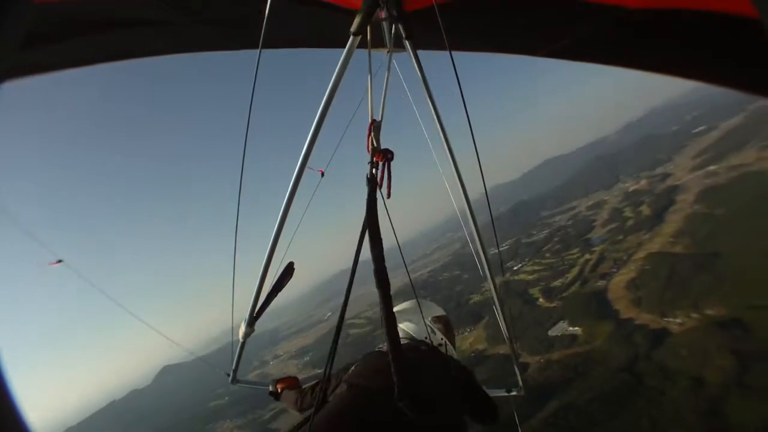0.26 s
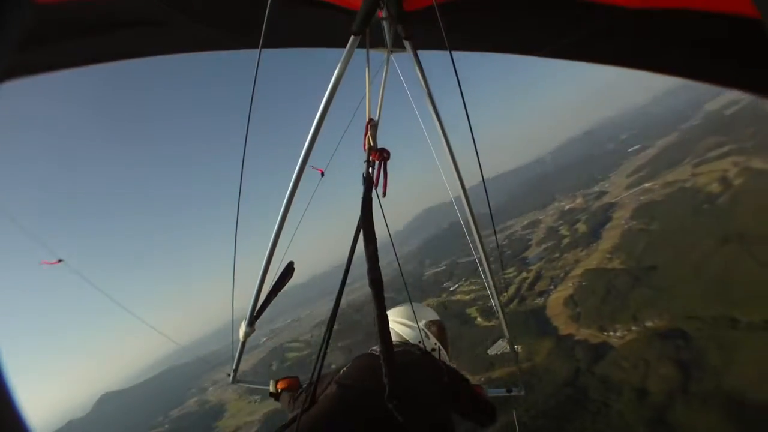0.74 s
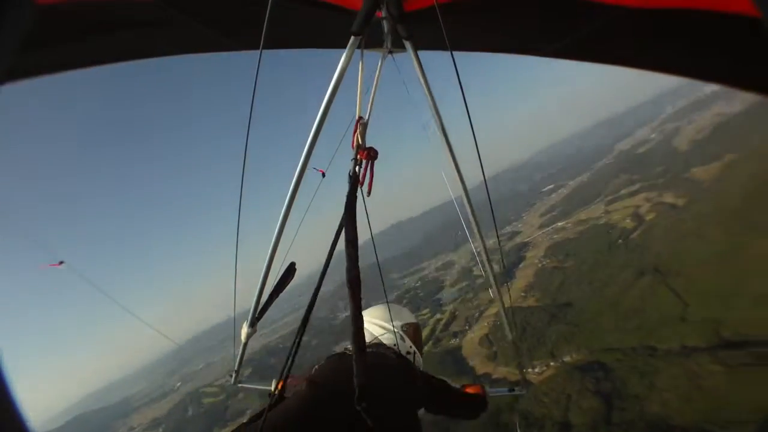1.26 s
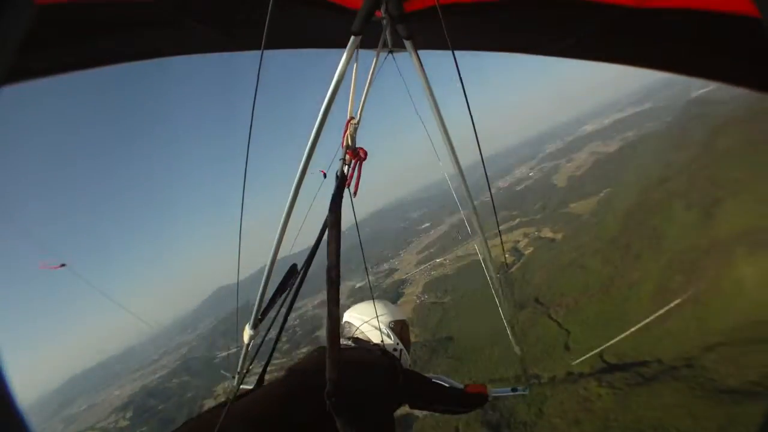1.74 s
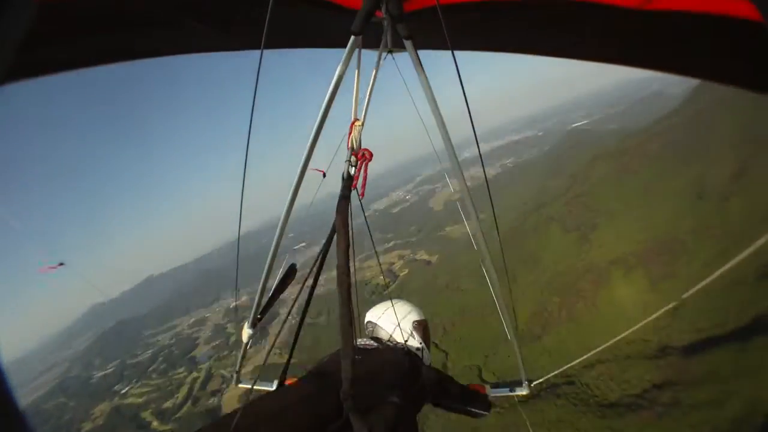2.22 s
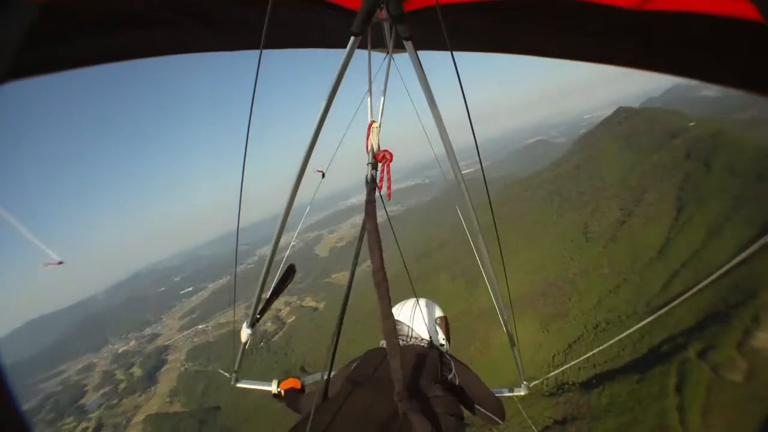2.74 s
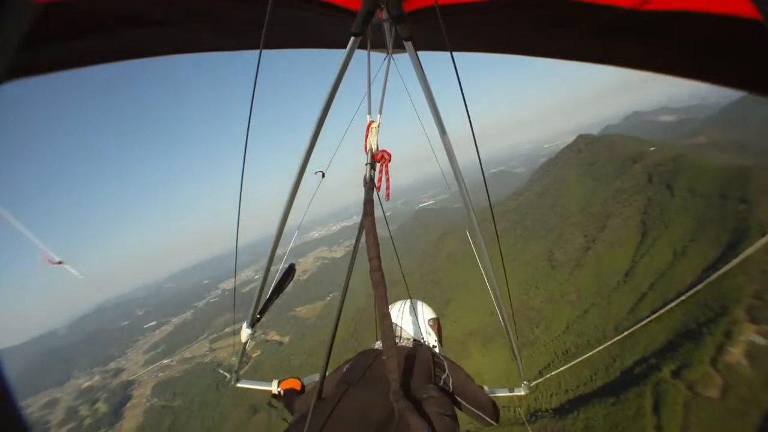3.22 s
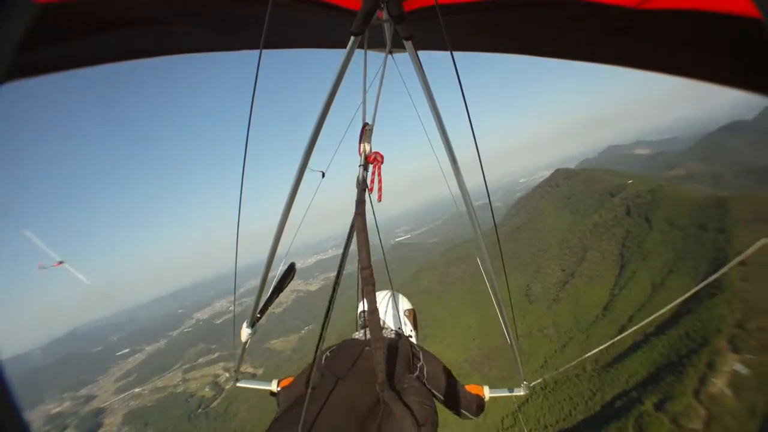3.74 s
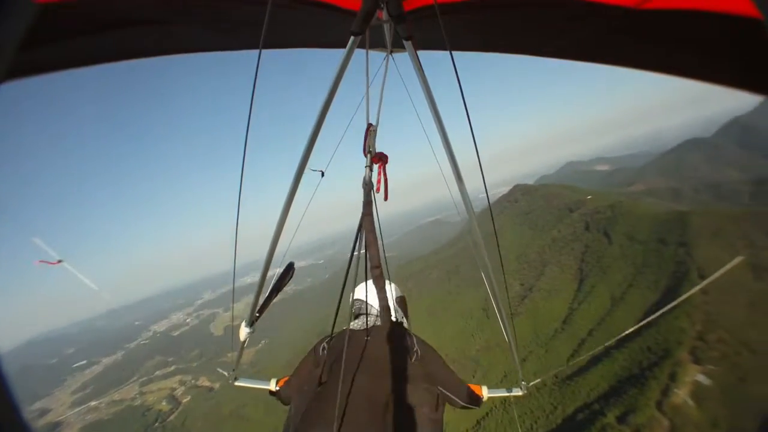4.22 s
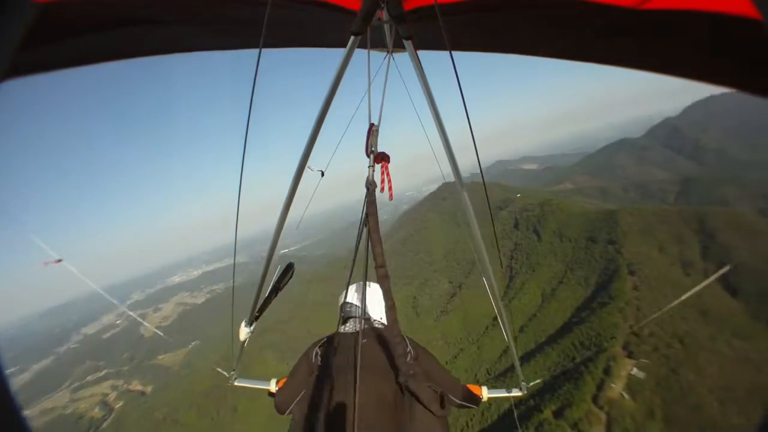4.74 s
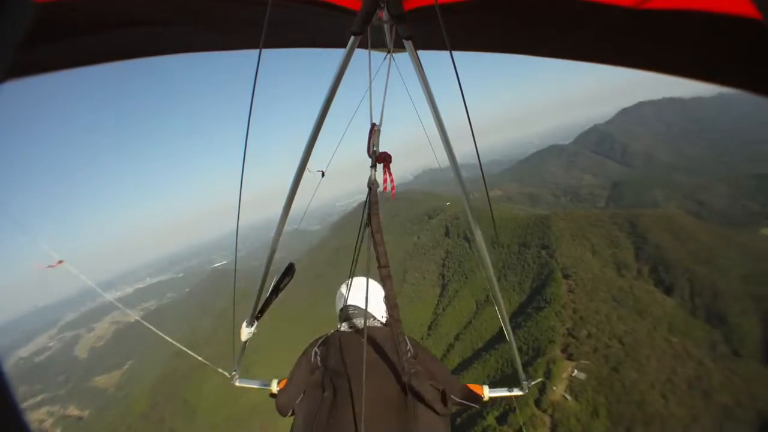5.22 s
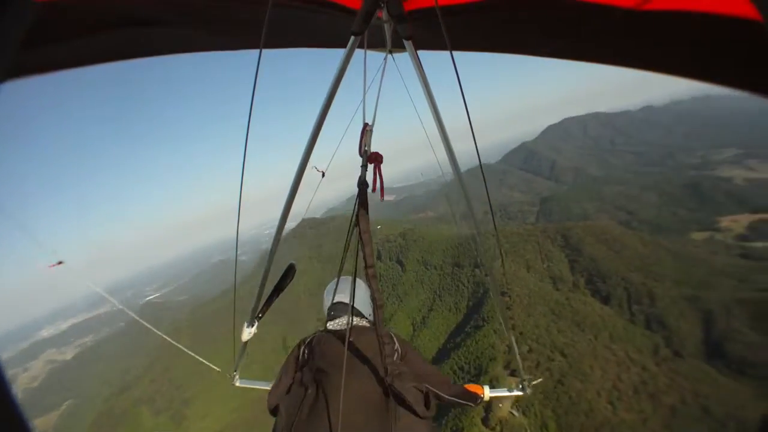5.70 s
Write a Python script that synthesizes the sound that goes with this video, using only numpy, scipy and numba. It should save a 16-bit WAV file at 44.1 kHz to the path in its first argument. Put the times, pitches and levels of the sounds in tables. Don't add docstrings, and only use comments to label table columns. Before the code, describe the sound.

Fast air rushes continuously past a sealed camera fixed to a hang glider in open sky. A dense low roar flutters rapidly, mixed with a wavering low hum that grows stronger after two seconds and rises slightly. The close microphone overloads, making the wind crunchy and gritty; the right side is thinner in the bass.

```python
import sys
import numpy as np
from scipy import signal
from scipy.fft import rfft, irfft, next_fast_len
from scipy.io import wavfile
from scipy.ndimage import uniform_filter1d
from numba import njit

SR = 44100
rng = np.random.default_rng(int(sys.argv[2]) if len(sys.argv) > 2 else 0)


def voltage_ratio(level):
    return 10 ** (np.asarray(level, float) / 20)


def dump(signal):
    limited = np.clip(np.atleast_2d(signal).T, -1, 1)
    pcm = np.round(limited * 32767).astype(np.int16)
    wavfile.write(sys.argv[1], SR, pcm)


N = 263277

# frequency in Hz, spectral level in dB per Hz.
HISS_SPECTRUM = [(300, 3), (800, -6), (1300, -12), (2200, -29), (3650, -25.5), (4900, -26), (5200, -64),
                 (6000, -42)]
# centre in Hz, width in Hz, lift in dB.
SHELL_MODES = [(1712, 536, 15), (2680, 430, 11.5), (3170, 480, 9.5), (4140, 260, 7), (4560, 480, 7.5)]
# peak time in seconds, change of level in dB.
GUSTS = [
    (0, -4),
    (.3, 0),
    (1.15, -0.5),
    (4.1, 2),
    (4.8, -0.5),
    (5.75, 2),
]
# frequency in Hz, spectral level in dB per Hz.
ROAR_SPECTRUM = [(8.8, -34), (15, -13), (59, -16.5), (135, -13), (167, -10), (209, -8.5), (237, -5),
                 (297, -5.5), (487, -4.5), (1000, -30), (1300, -57), (2200, -120)]
# centre in Hz, width in Hz, lift in dB.
CAVITY_MODES = [(635, 170, 0.57)]
# time in seconds, pitch in Hz, hum level in dB.
SHEDDING = [(0, 204.9, -18), (.15, 222, -15), (.45, 230, -14), (.9, 217, -16), (1.45, 222.9, -13),
            (1.75, 224, -16.5), (2.02, 236, -11), (2.38, 206.9, -10.5), (2.65, 220.1, -11),
            (2.9, 212.9, -10), (3.3, 239.3, -12), (3.55, 228.1, -15.5), (3.8, 251.2, -13),
            (4.25, 251.7, -11), (4.75, 240.6, -13.5), (5.25, 254.3, -13), (5.7, 234.6, -11),
            (5.97, 249.7, -12.5)]
# frequency in Hz, gain in dB.
CAMERA_RESPONSE = [(700, 0), (2000, -1.2), (4500, -1.8), (6000, -5), (8000, -2.5), (11000, -1.5),
                   (15000, -3)]
# frequency in Hz, spectral level in dB per Hz.
GRAIN_SPECTRUM = [(300, -21), (700, -4), (1400, -8), (2200, -15.5), (4000, -19), (5200, -26), (9500, -30.5),
                  (11000, -53), (11500, -18), (12000, -26), (12500, -17), (14000, -26), (15500, -28)]

GUST_HALF_S = 0.23
CRUISE_HZ = 232
ROAR_DB, LOW_HISS_DB, HIGH_HISS_DB = -10.5, -26, -36
ROAR_DB_PER_HZ, LOW_DB_PER_HZ, HIGH_DB_PER_HZ = 0.0265, -0.16, 0.06
SPEED_SMOOTH_S = 1.8
HOLD_HZ = 12000
TOP_HZ = 15750


def level(x):
    return x / np.sqrt(np.mean(x ** 2))


def walk(rate):
    k = int(SR / rate)
    held = np.repeat(rng.standard_normal(N // k + 1), k)
    slewed = uniform_filter1d(uniform_filter1d(held, k), k)
    return level(slewed[:N])


def curves(table):
    seconds, *columns = np.transpose(table)
    return [np.interp(np.arange(N) / SR, seconds, column) for column in columns]


def colour(x, points, modes=()):
    size = next_fast_len(N)
    hz = np.maximum(np.arange(size // 2 + 1) * SR / size, 1)
    point_hz, point_db = np.transpose(points)
    db = np.interp(np.log(hz), np.log(point_hz), point_db)
    for centre, width, lift in modes:
        db = db + lift / (1 + (2 * (hz - centre) / width) ** 2)
    return irfft(rfft(x, size) * voltage_ratio(db), size)[..., :N]


def shell_hiss(eddies, bright_db):
    puffs = voltage_ratio(0.83 * eddies + 0.5 * walk(300))
    split = signal.butter(2, 2300, fs=SR, output="sos")
    noise = rng.standard_normal(N)
    low = signal.sosfilt(split, noise)
    high = noise - low
    mix = voltage_ratio(0.33 * walk(45)) * low + voltage_ratio(bright_db + 0.22 * walk(45)) * high
    return level(colour(puffs * mix, HISS_SPECTRUM, SHELL_MODES))


def cavity_roar(eddies):
    turbulence = voltage_ratio(0.9 * eddies) * rng.standard_normal(N)
    return level(colour(turbulence, ROAR_SPECTRUM, CAVITY_MODES))


def vortex_hum(hz):
    wander = 1 + .035 * walk(45) + .045 * walk(120)
    phase = 2 * np.pi * np.cumsum(hz * wander) / SR
    strength = voltage_ratio(0.69 * walk(40) + 1.87 * walk(100))
    overtone = 0.16 * np.sin(2 * phase) - 0.13 * np.cos(2 * phase)
    return level(strength * (np.sin(phase) + strength * overtone))


def scene():
    hz, hum_db = curves(SHEDDING)
    faster = uniform_filter1d(hz, int(SPEED_SMOOTH_S * SR)) - CRUISE_HZ
    seconds = np.arange(N) / SR
    gust_db = sum(db * np.clip(1 - abs(seconds - s) / GUST_HALF_S, 0, 1) for s, db in GUSTS)
    roar_db = ROAR_DB + ROAR_DB_PER_HZ * faster
    low_db = LOW_HISS_DB + LOW_DB_PER_HZ * faster
    high_db = HIGH_HISS_DB + HIGH_DB_PER_HZ * faster
    eddies = level(0.96 * walk(30.2) + walk(80))
    hiss = voltage_ratio(low_db + gust_db + 10.0) * shell_hiss(eddies, high_db - low_db + 10.0)
    roar = voltage_ratio(roar_db + 6.5) * cavity_roar(eddies)
    hum = voltage_ratio(hum_db + 7.0) * vortex_hum(hz)
    air = hiss + roar + hum
    return np.array([air, air])


@njit
def duck(x, top, drop_db, recover, lag):
    y, cut_db = np.zeros(len(x)), 0.
    for i in range(len(x)):
        if i >= lag and abs(y[i - lag]) > top:
            cut_db += drop_db
        cut_db *= recover
        y[i] = x[i] * 10 ** (-cut_db / 20)
    return y


def overloaded_microphone(pressure):
    ticks = np.arange(N)
    x = np.interp(ticks + 1.8 * np.clip(pressure, -1.5, 1.5), ticks, pressure)
    x = duck(x, top=1.1, drop_db=.085, recover=np.exp(-1 / (.015 * SR)), lag=SR // 350)
    return x + 0.1 * x ** 2 - .075


def held_samples(x):
    taken = np.interp(np.arange(0, N / SR + .01, 1 / HOLD_HZ), np.arange(N) / SR, x)
    left = np.clip(taken, -.995, .995)
    bass_cut = signal.butter(1, 380, "high", fs=HOLD_HZ, output="sos")
    right = np.clip(voltage_ratio(1.72) * signal.sosfilt(bass_cut, left), -.995, .995)
    steps = np.repeat([left, right], 4, axis=1)
    return signal.resample_poly(steps, 147, 160, axis=1)[:, :N]


def camera_grain(steps):
    treble = signal.sosfilt(signal.butter(2, 1500, "high", fs=SR, output="sos"), steps)
    frame = level(np.sqrt(uniform_filter1d(treble ** 2, size=256) + 1e-12))
    grain = level(colour(frame * rng.standard_normal((2, N)), GRAIN_SPECTRUM))
    return colour(steps, CAMERA_RESPONSE) + voltage_ratio(-30.0) * grain


def roll_off(x):
    return signal.sosfilt(signal.butter(12, 16670, fs=SR, output="sos"), x)


def record(dry):
    steps = held_samples(overloaded_microphone(dry[0]))
    band_limit = signal.ellip(10, .1, 50, TOP_HZ, fs=SR, output="sos")
    mix = signal.sosfiltfilt(band_limit, camera_grain(steps))
    return roll_off(mix)


dry = scene()
out = record(dry)
dump(out)
```